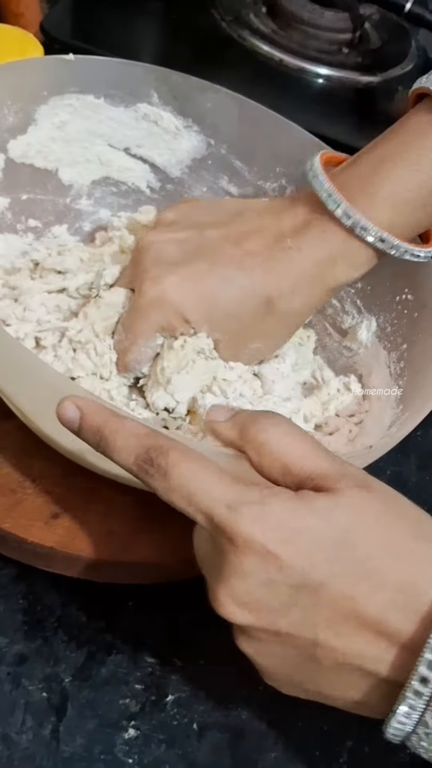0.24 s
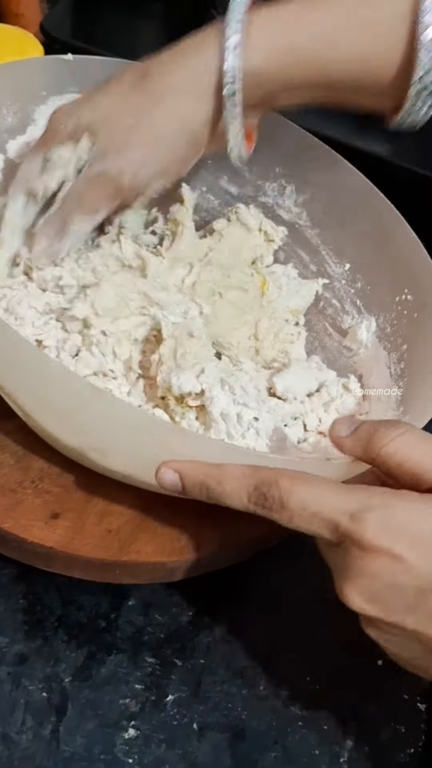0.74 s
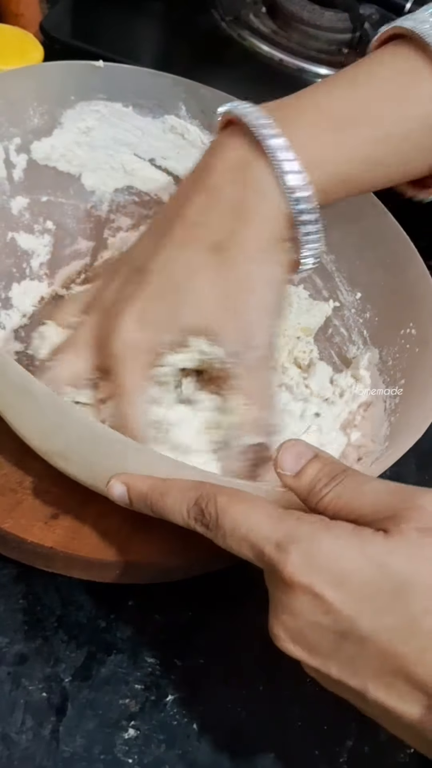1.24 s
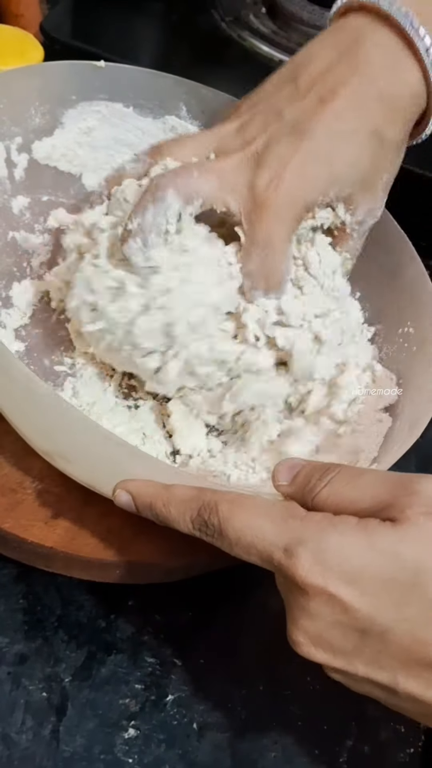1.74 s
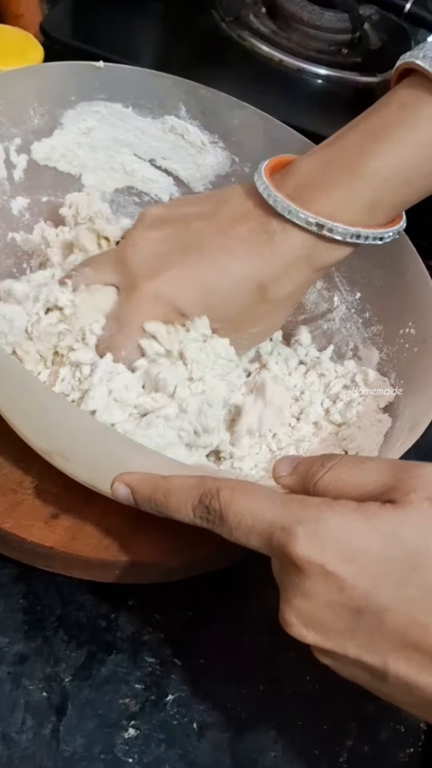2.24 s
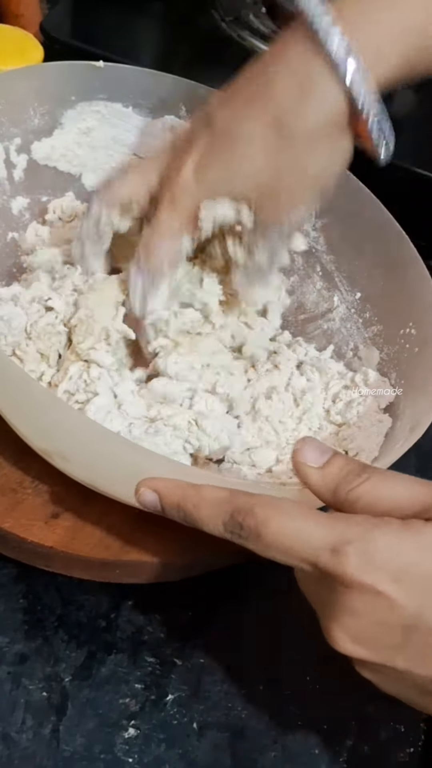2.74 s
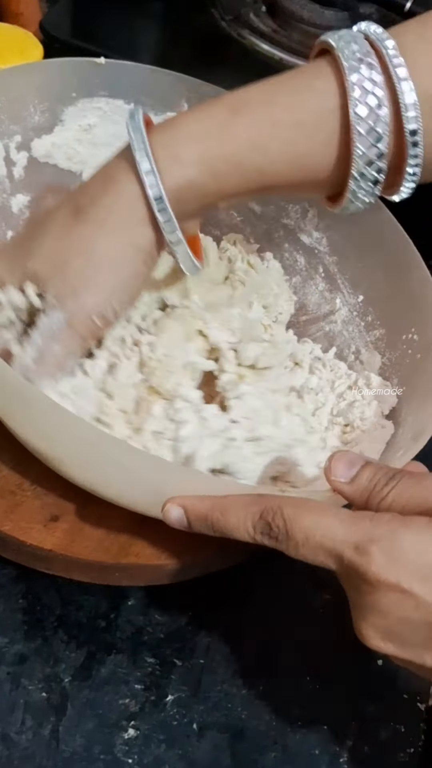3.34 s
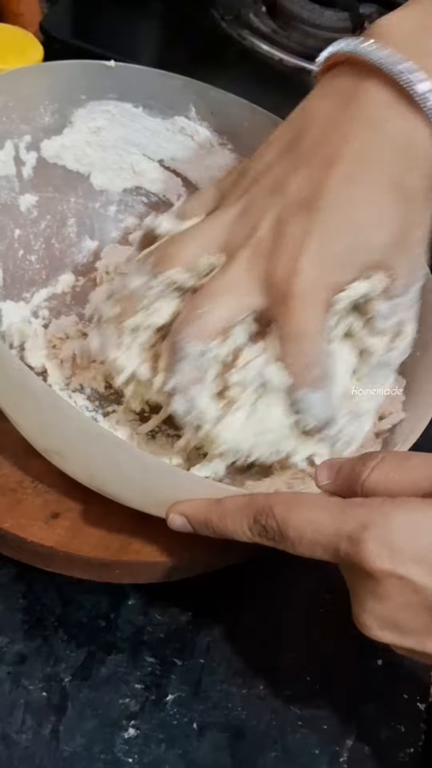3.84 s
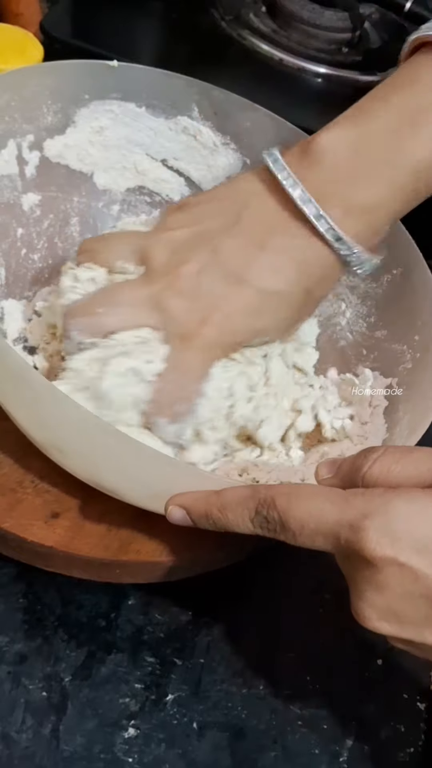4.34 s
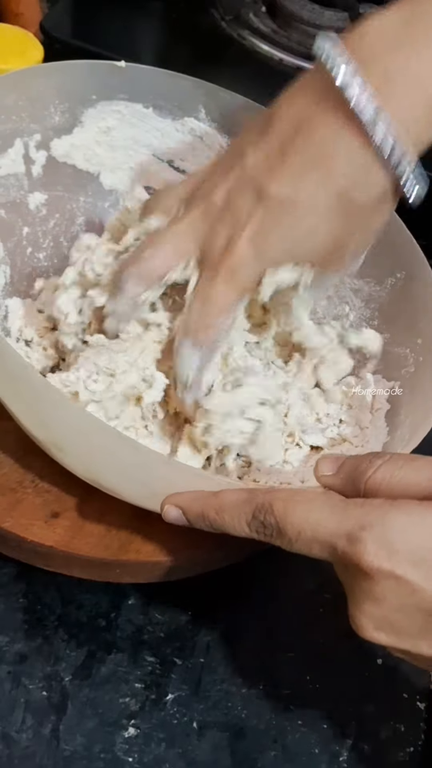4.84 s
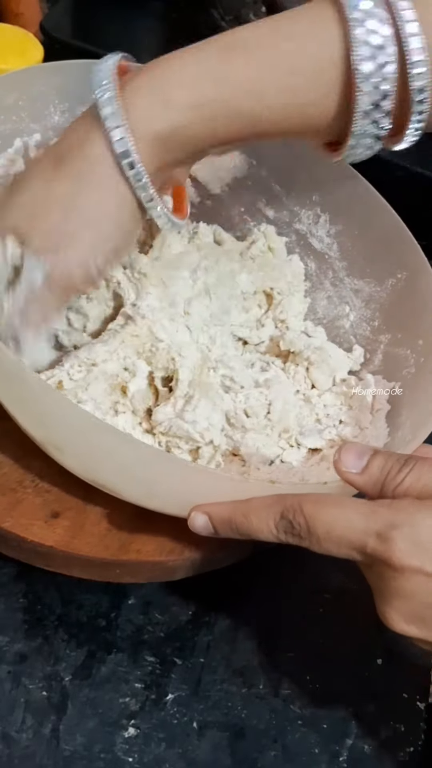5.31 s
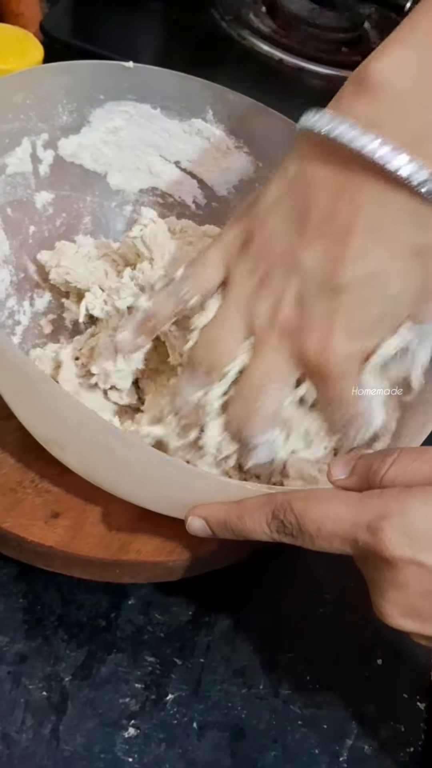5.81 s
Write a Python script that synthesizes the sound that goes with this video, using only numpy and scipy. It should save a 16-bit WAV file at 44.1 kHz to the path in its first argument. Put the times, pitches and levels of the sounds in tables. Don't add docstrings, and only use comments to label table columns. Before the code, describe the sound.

A hand works crumbly dough in a plastic bowl, dry gritty scrapes and hollow knocks over a low hum in a small kitchen.

```python
import sys
import numpy as np
from scipy import signal
from scipy.fft import rfft, irfft, next_fast_len
from scipy.io import wavfile

SR = 44100
rng = np.random.default_rng(int(sys.argv[2]) if len(sys.argv) > 2 else 0)


def unload_audio(sound):
    columns = np.transpose(np.atleast_2d(sound))
    steps = np.round(np.clip(columns, -1, 1) * 32767)
    wavfile.write(sys.argv[1], SR, steps.astype(np.int16))


def makeup_ratio(level_db):
    decades = np.asarray(level_db, float) / 20
    return 10 ** decades


N = 267687
PAD = next_fast_len(N + SR)
HZ = np.maximum(np.arange(PAD // 2 + 1) * SR / PAD, 1)
CONTROL_STEP = 40


def rms_one(x):
    return x / np.sqrt(np.mean(x ** 2) + 1e-20)


def at_hz(points, hz):
    table = np.array(points)
    return np.interp(np.log(hz), np.log(table[:, 0]), table[:, 1])


def upsample(curve):
    return np.interp(np.arange(N) / CONTROL_STEP, np.arange(len(curve)), curve)


def drift(rate):
    r = np.exp(-80 * np.pi * rate / SR)
    white = rng.standard_normal(N // CONTROL_STEP + 2002)
    slow = signal.lfilter([1], [1, -2 * r, r * r], white)[2000:]
    return upsample(rms_one(slow))


def ring(x, hz, t60):
    r, w = makeup_ratio(-60 / (t60 * SR)), 2 * np.pi * hz / SR
    return signal.lfilter([0, np.sin(w)], [1, -2 * r * np.cos(w), r * r], x + 1e-18)


def peak(hz, width_hz):
    return 1 / np.sqrt(1 + ((HZ - hz) / (width_hz / 2)) ** 2)


# [f/Hz, likeness/1]
LIKENESS = [(30, 0.94), (70, 1), (130, 0.73), (290, 0.72), (640, 0.32), (1400, 0), (4000, 0.011),
            (15000, 0)]


def stereo_noise(gain, grain_db=0.0):
    grains = np.minimum(rng.exponential(1, (2, N)), 4)
    white = rng.standard_normal((2, N)) * makeup_ratio(grain_db * grains)
    mid, side = rfft(white, PAD) * gain
    alike = np.clip(at_hz(LIKENESS, HZ), -1, 1)
    mid, side = np.sqrt(1 + alike) * mid, np.sqrt(1 - alike) * side
    return rms_one(irfft([mid + side, mid - side], PAD)[:, :N])


# [f/Hz, level/dB, t60/s]
ROOM_MODES = [(200, -8, .5), (250, -2, .5), (330, -5, .4), (401, 0, .4), (503, -2, .35), (579, -2, .3),
              (632, -1, .38), (680, 0, .33), (785, -10, .3), (943, -10, .4), (1152, -11, .3),
              (603, -2, .33), (1462, -8, .25), (1742, -8, .3), (2016, -11, .25), (2280, -12, .4)]


def modal_colour(depth_db):
    lifts = [makeup_ratio(depth_db + db) * peak(hz, 1.1 / t60) for hz, db, t60 in ROOM_MODES[:9]]
    return np.sqrt(1 + sum(lift ** 2 for lift in lifts))


RISE_FROM_DB = -13


def gestures(start, rise, hold, db, release_db_per_s):
    t = np.arange(0, N + CONTROL_STEP, CONTROL_STEP) / SR - np.reshape(start, (-1, 1))
    rise, hold, db = (np.reshape(v, (-1, 1)) for v in (np.maximum(rise, 1e-3), hold, db))
    rise_db = RISE_FROM_DB * np.clip(1 - t / rise, 0, 1)
    release_db = release_db_per_s * np.maximum(t - rise - hold, 0)
    power = makeup_ratio(2 * (db + rise_db - release_db)) * (t >= 0)
    return upsample(np.sqrt(np.sum(power, axis=0)))


# [start t/s, rise/s, hold/s, flour hiss level/dB, weight
# on the bowl/dB]
RUBS = [(0.0, 0.00081, 0.0034, -79, 22.5), (0.24, 0.11, 0.18, -71.5, -17), (0.244, 0.069, .03, -92.5, 20.5),
        (0.72, 0.02, 0.05, -59.5, 2), (0.823, 0.047, 0.094, -58, 5.5), (1.012, 0.076, 0.1, -61.5, 2),
        (1.224, 0.03, 0.1, -68, 3.5), (1.357, 0.041, 0.063, -70.5, -3.5), (1.805, 0.03, 0.02, -77, -6),
        (1.868, .002, 0.087, -71, -3.5), (1.963, 0.001, 0.012, -69, 14), (2.05, 0.045, 0.069, -77, 12.5),
        (2.333, 0.002, 0.013, -101, 33), (2.544, 0.057, 0.14, -71.5, -28),
        (3.008, 0.0053, 0.082, -66.5, 9.5), (3.081, 0.15, 0.12, -60.5, 3.5), (3.378, 0.072, 0.15, -70, 7),
        (3.5365, 0.002, 0.012, -81, 19), (4.047, 0.066, 0.042, -65, -5), (4.186, 0.002, 0.23, -83, 8.5),
        (4.76, 0.035, 0.035, -76.5, -13), (5.212, 0.035, 0.096, -62.5, 6), (5.277, 0.053, 0.3, -60, 3),
        (5.625, 0.035, 0.072, -67, 3), (5.762, 0.017, 0.054, -67, -8)]
# [start t/s, rise/s, hold/s, flour hiss level/dB, weight on the bowl/dB]
FINGERING = [
    (0.71, 0.0041, 0.012, -71, 10),
    (1.499, 0.009, 0.016, -105, 6.5),
    (3.78, 0.042, 0.4, -97, 19.7),
    (4.422, 0.02, .06, -86.5, 4.9),
    (4.639, 0.062, 0.018, -99.5, 20.5),
    (5.202, 0.0017, 0.036, -73, 5.8),
    (5.95, 0.014, 0.042, -80, 2.4),
    (6.055, 0.0076, .02, -79, 5.1),
]
# [level re flour/dB, share of weight/1, release/(dB/s)]
FRICTIONS = [
    (-2.5, 0.12, 144),
    (3.5, 0.64, 118),
    (-3, 1.16, 152),
    (-1.5, 1.68, 121),
]
# [f/Hz, level/dB per Hz]
FLOUR = [(2940, -23), (5000, -5), (6850, -0.5), (8110, -6), (9430, -1), (13000, 2), (15600, -3),
         (15900, -36)]
GRIT = [(2000, -1.5), (3000, -2), (4000, -4.5), (6000, -8.5), (7300, -13.5), (8300, -41)]
DRAG = [(800, 0), (1400, 6), (2000, 6.5), (2800, 2.5), (4000, -50)]
PRESS = [(150, -28), (300, 9.5), (650, 10), (1000, 8.5), (1600, -32)]


def hand():
    start, rise, hold, db, weight_db = np.transpose(RUBS + FINGERING)
    flour, grit, drag, press = (gestures(start, rise, hold, db + offset_db + share * weight_db, release)
                                for offset_db, share, release in FRICTIONS)
    lumps_db, flutter_db = 1.3 * drift(14), 1.8 * drift(30)
    lean = makeup_ratio([[1.8], [-1.8]])
    flour = flour * makeup_ratio(lumps_db) * stereo_noise(makeup_ratio(at_hz(FLOUR, HZ)), grain_db=3.0) * lean
    grit = grit * makeup_ratio(lumps_db + 0.99 * drift(5)) * stereo_noise(makeup_ratio(at_hz(GRIT, HZ)), grain_db=1.5)
    drag = drag * makeup_ratio(lumps_db + flutter_db) * stereo_noise(makeup_ratio(at_hz(DRAG, HZ)), grain_db=0.0)
    press_gain = makeup_ratio(at_hz(PRESS, HZ)) * modal_colour(depth_db=9.0)
    press = press * makeup_ratio(flutter_db) * stereo_noise(press_gain, grain_db=0.5)
    return flour + grit + drag + press


CRUMBS_PER_S, CRUMBS_DB, CRUMB_CYCLES = 500, -8, 5.3


def crumbs():
    start, rise, hold, db, weight_db = np.transpose(RUBS + FINGERING)
    sizes = makeup_ratio(1.8 * np.minimum(rng.exponential(1, (2, N)), 4)) * rng.choice([-1, 1], (2, N))
    born = rng.random(N) < CRUMBS_PER_S / SR
    dealt = rng.integers(0, 12, N)
    snaps = 0
    for k, hz in enumerate(np.geomspace(1200, 6500, 12)):
        snaps = snaps + ring(sizes * born * (dealt == k), hz, CRUMB_CYCLES / hz)
    gain = gestures(start, rise, hold, db + CRUMBS_DB + 0.76 * weight_db, release_db_per_s=150.0)
    return gain * rms_one(snaps)


# [start t/s, hold/s, level/dB, f/Hz]
CATCHES = [(0.007, 0.023, -39.5, 886), (0.265, 0.034, -57, 650), (3.55, 0.028, -45, 523),
           (3.554, 0.016, -50, 680), (4.213, 0.028, -48, 652), (0.014, 0.018, -44.5, 1120),
           (0.784, 0.027, -49, 623), (0.718, 0.016, -47.5, 926), (0.72, 0.032, -55.5, 2950),
           (0.918, 0.059, -62, 2100), (3.02, 0.017, -55, 2900), (3.224, 0.032, -62, 4300),
           (3.28, 0.036, -53, 1550), (3.519, 0.02, -55, 1910), (2.129, 0.015, -55, 1500),
           (2.166, 0.013, -48.5, 790), (4.075, 0.1, -60, 820), (5.204, 0.058, -62.5, 2010),
           (5.204, 0.064, -60, 2600), (5.257, 0.025, -69, 1510), (5.345, 0.029, -51.5, 1458),
           (5.269, 0.035, -49.5, 594), (3.885, 0.31, -73, 1500), (4.676, 0.039, -73, 1450),
           (5.3, 0.027, -58, 3100), (5.574, 0.038, -58, 3330), (5.584, 0.03, -61, 1390)]
CATCH_RISE_S, CATCH_RELEASE_DB_PER_S, CATCH_CYCLES = 0.0017, 356, 12


def catches():
    out, white = np.zeros((2, N)), rng.standard_normal((2, N))
    for s, hold, db, hz in CATCHES:
        at = round(s * SR)
        near_by = slice(at, at + SR // 2)
        t60 = CATCH_CYCLES / hz
        tone = ring(ring(white[:, near_by], hz, t60), hz, t60)
        gain = gestures([s], CATCH_RISE_S, hold, db, CATCH_RELEASE_DB_PER_S)
        out[:, near_by] += gain[near_by] * rms_one(tone)
    return out


# [f/Hz, ring/cycles]
BOWL = [
    (653, 5.2),
    (382, 9.1),
    (850, 2.3),
    (1488, 9),
    (1736, 12.6),
    (2246, 13.4),
]
# [t/s, wall level/dB, thud, rim and edge
# level re wall/dB]
KNOCKS = [(0.727, -34.5, -5, -25, -13.5), (1.962, -43, -25, 10.5, -1.5), (2.33, -21.5, -14, -14, -9),
          (3.001, -39, -24, -32, -41), (3.5362, -27, -1, -20.5, -22.5), (4.185, -22.5, -11, -9, -9.5),
          (4.308, -35, -20, -14, -19), (0.0205, -39, -10, 0.5, -17), (0.0905, -62, -15, 9, -16),
          (0.3, -50, -10, -4, -12), (1.499, -51, -12, -26, -26), (2.575, -55.5, 1, -18, -15),
          (2.8, -61, -20, -18, -11), (3.025, -54.5, 4.5, -18, -6), (4.952, -57, 7, -24, -30),
          (5.2025, -57, 4, -16, 1), (5.287, -54, -34, 11.5, -17)]
# [t/s, wall level/dB, thud, rim and edge level re wall/dB]
BUMPS = [
    (0.021, -52, -16, -3, -29),
    (0.268, -44.5, -16, -3.5, -25),
    (0.29, -44.5, -19, -1.5, -14),
    (0.309, -52, -26, 6, -12),
    (2.138, -45.5, -2, 0, -12),
    (2.178, -44.5, 2.5, 3.5, -13),
    (3.298, -54, 6, 8, 3),
    (5.259, -36, -6, -29, -9),
    (5.295, -44, -19, -11, -31),
]
UPPER_WALL_DB, UPPER_WALL_SHARE = -1.5, 0.64
LIP_DB = -3.5


def knocks():
    click = (np.arange(2000) == 0) * 1.0
    rings = [ring(ring(click, hz, cycles / hz), hz, cycles / hz) for hz, cycles in BOWL]
    rings = np.diff(rings, prepend=0)
    signs = [[1], [1], [1], [-1], [1], [-1]]
    rings /= np.abs(rings).max(axis=1, keepdims=True) * signs
    crack = ring(ring(click, 3510, 0.012) + 0.38 * ring(click, 4900, 0.002), 4700, 0.0021)
    rings[-1] += makeup_ratio(-8) * crack / np.abs(crack).max()
    cluster_db = -60 * np.arange(1500) / SR / 0.098 - 27.0
    clusters = rng.standard_normal((len(BUMPS), 1500)) * makeup_ratio(cluster_db)
    contacts = [[1]] * len(KNOCKS) + list(clusters)
    out = np.zeros(N + 4000)
    for (s, db, thud_db, rim_db, edge_db), contact in zip(KNOCKS + BUMPS, contacts):
        upper_db = UPPER_WALL_DB + UPPER_WALL_SHARE * max(rim_db, edge_db)
        levels_db = db + np.array([0, thud_db, upper_db, rim_db, edge_db + LIP_DB, edge_db])
        blow = np.convolve(makeup_ratio(levels_db) @ rings, contact)
        at = round(s * SR)
        out[at:at + len(blow)] += blow
    return out[:N]


CRACK_DB, CRACK_T60_S = -10, 0.011
CRACK_BAND_HZ = [3300, 5600]


def cracks():
    out, t = np.zeros((2, N)), np.arange(900) / SR
    white = rng.standard_normal((len(KNOCKS), 3, len(t)))
    band = signal.butter(2, CRACK_BAND_HZ, "band", fs=SR, output="sos")
    bursts = signal.sosfilt(band, white[:, :1] + 0.6 * white[:, 1:])
    for (s, db, thud_db, rim_db, edge_db), burst in zip(KNOCKS, bursts):
        at = round((s + NEAR_ECHOES[0][0]) * SR)
        out[:, at:at + len(t)] += makeup_ratio(db + edge_db + CRACK_DB - 60 * t / CRACK_T60_S) * burst
    return out


# [t/s, knock peak level/dB, counter ring level/dB]
THUMPS = [
    (0.725, -41.5, -45),
    (3.536, -29.5, -29),
    (3.547, -32.5, -53),
    (3.627, -45, -31),
    (3.711, -71, -39),
    (5.454, -41.5, -61),
    (5.651, -37, -46),
    (5.664, -39, -37),
    (5.685, -42, -56),
]
# [f/Hz, level/dB, t60/s]
BOARD = [(265.6, 0.5, 0.055), (395.3, 0.5, 0.022), (170, -7, 0.067)]
COUNTER_HZ, COUNTER_T60_S = 119.5, 0.22


def thumps():
    clicks = np.zeros((2, N))
    for s, *levels_db in THUMPS:
        clicks[:, round(s * SR)] = makeup_ratio(np.array(levels_db))
    knock = 0
    for hz, db, t60 in BOARD:
        once = ring(clicks[0], hz, t60) * makeup_ratio(db)
        soft = ring(once, hz, t60)
        knock = knock + soft * np.abs(once).max() / np.abs(soft).max()
    return knock, ring(clicks[1], COUNTER_HZ, COUNTER_T60_S)


# [t/s, peak level/dB, L-R level/dB]
TICKS = [(1.818, -71, -3), (1.869, -42, 7), (1.9633, -44, 3), (2.737, -50, 11), (3.0116, -47, 16),
         (.7163, -57, -1), (.7313, -51, -1), (2.063, -56, 0), (2.605, -64, 2), (3.026, -51, 9),
         (4.0637, -63, 0), (4.383, -65, 0), (5.0909, -71, -2), (5.1886, -69, -1), (5.2036, -63, -2),
         (5.9289, -64, -1)]


def ticks():
    out, t = np.zeros((2, N)), np.arange(400) / SR
    white = rng.standard_normal((len(TICKS), 2, len(t) + 1))
    bright = signal.lfilter([1, 0, -1], [1, .1], np.diff(white))
    bursts = bright * makeup_ratio(-60 * t / 0.009)
    for (s, db, pan_db), burst in zip(TICKS, bursts):
        at = round(s * SR)
        sides_db = np.array([[pan_db], [-pan_db]]) / 2
        out[:, at:at + len(t)] += makeup_ratio(db - 17.0 + sides_db) * burst
    return out


# [lag t/s, left level/dB, right level/dB]
NEAR_ECHOES = [
    (.001, 2.5, -4.5),
    (.0028, -13.5, -24),
    (.0046, -22, -7.5),
    (.0065, -23, -6),
    (0.0109, -17, -10.5),
    (0.0251, -6.5, -10.5),
    (.0365, -16, -19),
]
BLOW_TOP_HZ, WALL_DULL_HZ, WALL_ECHO_FROM_S = 5500, 2400, .01


def near(x):
    x = signal.sosfilt(signal.butter(2, BLOW_TOP_HZ, fs=SR, output="sos"), x + 1e-18)
    dull = signal.sosfilt(signal.butter(2, WALL_DULL_HZ, fs=SR, output="sos"), x)
    out = np.zeros((2, N))
    for s, left_db, right_db in NEAR_ECHOES:
        lag = round(s * SR)
        echo = x if s < WALL_ECHO_FROM_S else dull
        out[:, lag:] += makeup_ratio([[left_db], [right_db]]) * echo[:N - lag]
    return out


# [f/Hz, t60/s]
ROOM_T60 = [(100, 0.89), (300, 0.39), (1000, 0.44), (2500, 0.35), (6000, 0.35), (15000, 0.67)]
# [f/Hz, level/dB]
DIFFUSE = [(200, -1), (400, -4), (700, -5), (1200, -1), (2200, -0.5), (5000, 2)]
MODE_LIFT_DB = [-7, -0.5, 1.5, -1, -1, -1, 0, -1.5, -2, 11, -1, -7.5, 0, 4, -12, 7.5]
FIRST_WALL_S, ROOM_BUILD_S = .004, 0.008


def kitchen(x):
    t, centres = np.arange(SR) / SR, 100 * 2 ** np.arange(0, 7.5, .5)
    white, alike = rng.standard_normal((2, SR)), np.clip(at_hz(LIKENESS, centres), -1, 1)
    opposite = np.array([[1], [-1]])
    tail = np.zeros((2, SR))
    for hz, c in zip(centres, alike):
        edges = [hz / 2 ** .25, hz * 2 ** .25]
        mid, side = signal.sosfilt(signal.butter(2, edges, "band", fs=SR, output="sos"), white)
        pair = np.sqrt(1 + c) * mid + np.sqrt(1 - c) * side * opposite
        tail += pair * makeup_ratio(at_hz(DIFFUSE, hz) - 60 * t / at_hz(ROOM_T60, hz))
    spreads = rng.uniform(-np.pi / 2, np.pi / 2, len(ROOM_MODES))
    for (hz, db, t60), spread, lift_db in zip(ROOM_MODES, spreads, MODE_LIFT_DB):
        phase = opposite * spread * (1 - at_hz(LIKENESS, hz))
        tail += makeup_ratio(db + lift_db - 26 - 60 * t / t60) * np.sin(2 * np.pi * hz * t + phase)
    tail += makeup_ratio(-8.0 - 60 * t / 0.5) * np.sin(2 * np.pi * LOW_MODES[0][0] * t)
    tail *= np.clip((t - FIRST_WALL_S) / ROOM_BUILD_S, 0, 1)
    return irfft(rfft(tail, PAD) * rfft(x, PAD), PAD)[:, :N]


# [start t/s, length/s, level/dB]
WHINE = [(2.875, .03, -84), (2.91, .09, -80), (3.0, .16, -70), (3.2, .03, -68), (3.27, .06, -71),
         (3.37, .07, -71), (3.45, .1, -77), (3.59, .05, -76), (3.67, .05, -79), (3.76, .1, -89),
         (3.87, .08, -87)]
# [start t/s, length/s, level/dB]
WHINE_LOWER = [
    (3.43, .12, -75),
    (3.62, .18, -83),
    (3.89, .14, -80),
]
WHINE_HZ, WHINE_UPPER_HZ, WHINE_LOWER_HZ = 3590, 3950, 2300
WHINE_RISE_S, WHINE_RELEASE_DB_PER_S = .03, 300


def whine():
    upper, lower = (gestures(start - WHINE_RISE_S, WHINE_RISE_S, length, db, WHINE_RELEASE_DB_PER_S)
                    for start, length, db in (np.transpose(WHINE), np.transpose(WHINE_LOWER)))
    phase = 2 * np.pi * np.cumsum(WHINE_HZ - 15 + 22 * drift(42)) / SR
    tone = makeup_ratio(3.0 * drift(45)) * np.sin(phase + [[0], [1.5]])
    neighbour = .2 * stereo_noise(peak(WHINE_UPPER_HZ, 60) ** 2)
    rough = stereo_noise(peak(WHINE_LOWER_HZ, 50) ** 2)
    return upper * makeup_ratio(3) * (tone + neighbour) + lower * rough


# [start t/s, hold/s, level/dB, f/Hz]
DRONE = [
    (5.099, 0.18, -60.5, 249),
    (5.303, 0.45, -59, 250.4),
    (5.66, 0.09, -61.5, 249.4),
    (5.905, .15, -63, 269),
    (5.186, 0.25, -61, 334),
    (5.433, 0.31, -66, 430),
]
DRONE_RISE_S, DRONE_RELEASE_DB_PER_S = 0.039, 150


def drone():
    out, t = 0, np.arange(N) / SR
    for s, hold, db, hz in DRONE:
        phase = 2 * np.pi * (hz * t + np.cumsum(3.88 * drift(9.76)) / SR)
        gain = gestures([s], DRONE_RISE_S, hold, db + 3, DRONE_RELEASE_DB_PER_S)
        out = out + gain * makeup_ratio(3.3 * drift(22)) * np.sin(phase)
    return out


# [f/Hz, width/Hz]
LOW_MODES = [(118.67, 8.786), (84.24, 10.34)]
# [middle t/s, length/s, level/dB]
UPPER_SWELLS = [(-0.006, 0.081, -35.5), (0.122, 0.086, -44), (0.638, 0.069, -43.5), (0.717, 0.071, -41),
                (1.302, 0.066, -45), (1.492, 0.14, -45.5), (1.656, 0.093, -45.5), (1.808, 0.061, -45.5),
                (2.022, 0.2, -45.5), (2.384, 0.019, -48.5), (2.484, 0.065, -46), (2.672, 0.088, -46.5),
                (3.151, 0.038, -46), (3.565, 0.075, -32.5), (3.973, 0.081, -44), (4.163, 0.043, -44),
                (4.24, 0.033, -43), (4.382, 0.055, -43.5), (4.527, 0.05, -47.5), (4.912, 0.07, -46.5),
                (0.792, 0.064, -47), (0.96, 0.076, -50.5), (1.15, .07, -50.5), (3.865, 0.093, -47.5),
                (4.7, 0.085, -70), (5.006, 0.062, -41), (5.163, 0.054, -42), (5.246, 0.097, -42.5),
                (5.51, 0.19, -42.5), (5.865, 1, -44.5), (5.962, 0.11, -43)]
# [middle t/s, length/s, level/dB]
LOWER_SWELLS = [(0.07, 0.13, -46.5), (0.27, 0.065, -54), (0.511, 0.11, -57), (0.94, 0.21, -50.5),
                (1.36, 0.078, -47.5), (1.67, 0.073, -44.5), (2.0, 0.076, -45), (2.22, 0.19, -52),
                (2.69, 0.1, -47), (3.3, 0.044, -46), (3.43, 0.041, -44), (3.7, 0.15, -44),
                (3.82, 0.079, -42), (4.3, 0.13, -44.5), (4.428, 0.07, -43.5), (4.83, 0.12, -44.5),
                (4.95, 0.12, -42), (5.17, 0.055, -46), (5.55, 0.046, -48), (5.95, 0.048, -60)]
LULL_DB = [-56, -57]


def rumble():
    out, t = 0, np.arange(N) / SR
    for (hz, width_hz), swells, lull_db in zip(LOW_MODES, [UPPER_SWELLS, LOWER_SWELLS], LULL_DB):
        power = makeup_ratio(2 * (lull_db + 2.44 * drift(2.7)))
        for s, length, db in swells:
            power = power + makeup_ratio(2 * db) * np.exp(-(3.16 * (t - s) / length) ** 2)
        phase = 2 * np.pi * (hz * t + np.cumsum(width_hz / 2 * drift(14.1)) / SR)
        out = out + np.sqrt(2 * power) * makeup_ratio(1.29 * drift(110)) * np.sin(phase + [[0], [.15]])
    return out


INSECTS_HZ, INSECTS_WIDTH_HZ, INSECTS_DB = 7340, 260, -79


def insects():
    chorus = peak(INSECTS_HZ, INSECTS_WIDTH_HZ) ** 2
    singer = 4.7 * peak(7060, 50) ** 2
    return makeup_ratio(INSECTS_DB + 2.0 * drift(22)) * stereo_noise(chorus + singer)


# [f/Hz, level/dB per Hz]
AIR = [(18, -47.5), (30, -8.5), (86, 2.5), (127, -2.5), (344, -18), (435, -14), (795, -27.5), (907, -26.5),
       (1150, -32), (2040, -42.5), (5680, -55.5), (7200, -35), (8200, -57.5), (13500, -51.5), (15800, -52)]
AIR_DB = -51


def room_air():
    gain = makeup_ratio(at_hz(AIR, HZ)) * modal_colour(depth_db=12.0)
    low_cut = 1 - 0.48 * peak(145.5, 36) ** 2
    return makeup_ratio(AIR_DB) * stereo_noise(gain * low_cut)


BOARD_ROOM_DB, ROOM_DB = -16, -22.5


def scene():
    blows, (board, boom) = knocks(), thumps()
    room = makeup_ratio(ROOM_DB) * kitchen(blows + makeup_ratio(BOARD_ROOM_DB) * board)
    strokes = hand() + crumbs() + catches()
    impacts = near(blows + board) + boom + cracks() + ticks()
    background = whine() + drone() + rumble() + insects() + room_air()
    return strokes + impacts + room + background


def top_cut(x):
    return signal.sosfilt(signal.butter(12, 16400, fs=SR, output="sos"), x)


LOW_CUT_HZ, TOP_HZ, PEAK_CEILING = 87, 16300, .17


def record(dry):
    high = signal.sosfilt(signal.butter(2, LOW_CUT_HZ, "high", fs=SR, output="sos"), dry)
    limited = PEAK_CEILING * np.tanh(high / PEAK_CEILING)
    mix = signal.sosfilt(signal.cheby2(12, 60, TOP_HZ + 300, fs=SR, output="sos"), limited)
    return top_cut(mix)


dry = scene()
out = record(dry)
unload_audio(out)
```